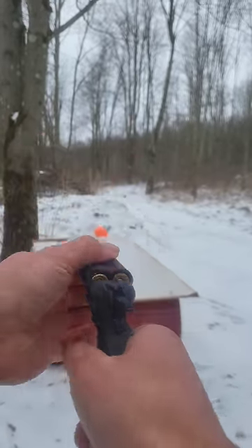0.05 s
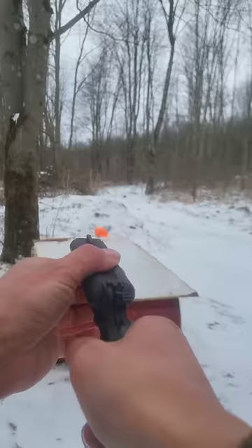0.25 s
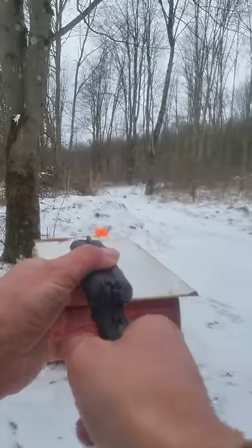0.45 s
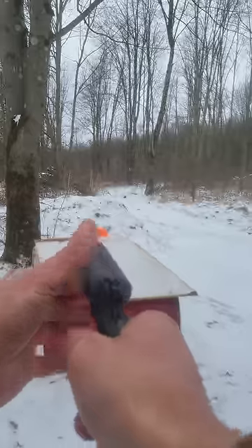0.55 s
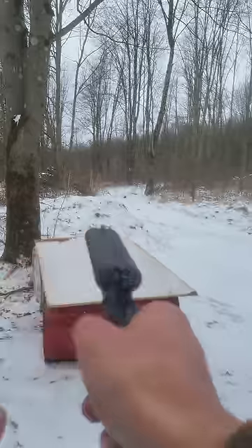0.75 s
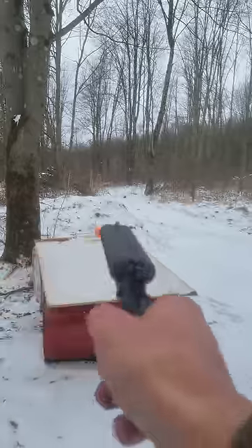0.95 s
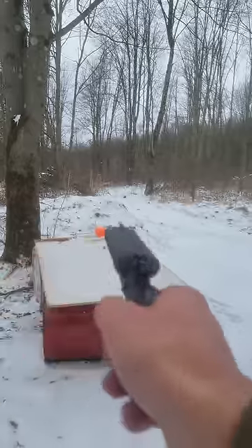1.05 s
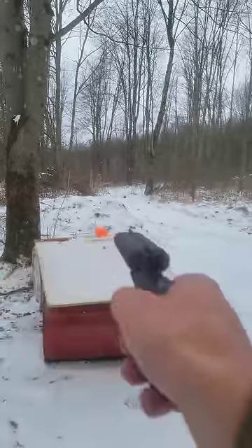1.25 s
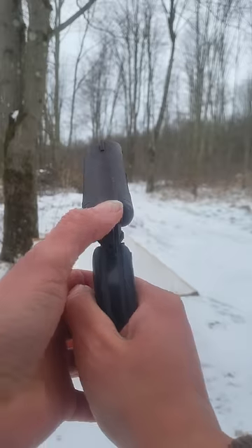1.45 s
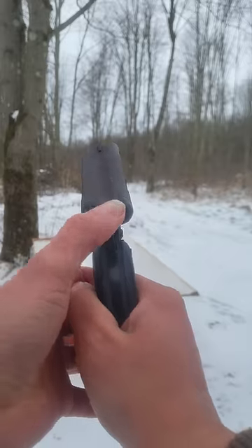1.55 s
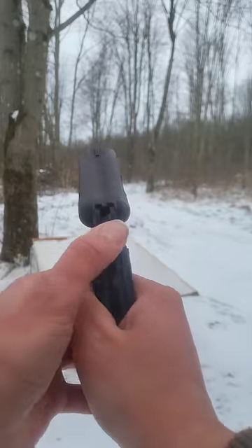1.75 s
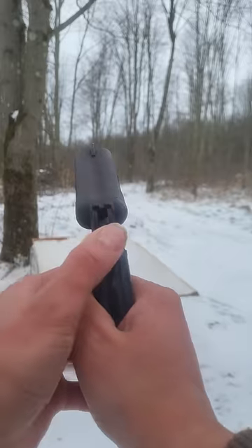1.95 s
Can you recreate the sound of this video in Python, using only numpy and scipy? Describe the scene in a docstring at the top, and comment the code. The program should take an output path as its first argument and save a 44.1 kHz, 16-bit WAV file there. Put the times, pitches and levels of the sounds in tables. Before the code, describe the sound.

A small break-action gun snaps shut, heard close outdoors. A crisp latch click comes at 0.12 s, then a very short rising scrape and a loud, hard metallic clack at 0.24 s with a brief, faint scattered tail. A dull soft bump at 0.95 s sits among sleeve rustle and low wind, which drop suddenly at 1.4 s. A faint tick at 1.72 s precedes small hammer clicks around 1.84-1.86 s.

```python
"""Closing a small gun in a snowy wood

Light wind rumbles and a sleeve rustles: both are coloured noise whose levels rise and fall.
The latch clicks, then the barrels scrape home and snap shut; later the hammer is drawn in small clicks.
Each metal part is a set of dying tones, tapped by short rough blows or driven by growing friction noise.
Snow, hands, a crate and trees answer with decaying noise; small ticks and dull bumps are damped swings.
At 1.404 s the wind and the rustle drop suddenly."""
import sys
import numpy as np
from scipy import signal
from scipy.fft import rfft, irfft
from scipy.io import wavfile
from scipy.ndimage import uniform_filter1d

SR = 44100
rng = np.random.default_rng(int(sys.argv[2]) if len(sys.argv) > 2 else 0)


def volts_from_decibels(level):
    """Turn decibel levels (scalar or array-like) into linear amplitude factors."""
    exponent = np.asarray(level, float) / 20
    return 10 ** exponent


def int16_out(signal):
    """Quantize to a 16-bit WAV file."""
    q = np.round(np.clip(np.atleast_2d(signal).T, -1, 1) * 32767)
    wavfile.write(sys.argv[1], SR, q.astype(np.int16))


N = 88200  # samples, two seconds


def evened(x):
    """Scale a signal to an average (rms) level of one."""
    return x / np.sqrt(np.mean(x ** 2) + 1e-20)


def read(points, hz):
    """Read a curve between its points, along a logarithmic pitch scale."""
    point_hz, value = np.transpose(points)
    return np.interp(np.log(hz + 1), np.log(point_hz + 1), value)


def add(mix, start_s, sound):
    """Lay a sound into the mix at its start time, cut off at the end of the mix."""
    part = mix[:, round(start_s * SR):][:, :sound.shape[1]]
    part += sound[:, :part.shape[1]]


# How much louder noise is on the left than on the right.
# Each row: frequency in Hz, left minus right in dB.
SIDE_BALANCE = [(300, 0), (1300, -6), (3000, 0.5), (6000, 5), (15000, -0.5)]


def noise(colour, same, length, patchy_db=0., flicker_db=0., size=512):
    """Coloured stereo noise from random short-time spectra, with drifting patches and wide flicker."""
    frames, hz = length * 4 // size + 5, np.fft.rfftfreq(size, 1 / SR)
    a, b, c, d, patch = rng.standard_normal((frames, len(hz), 5)).T
    patch = uniform_filter1d(patch, size=6, axis=0)  # smooth across frequency
    patch = evened(uniform_filter1d(patch, size=14, axis=1))  # smooth along time
    flicker = evened(uniform_filter1d(rng.standard_normal(frames), size=3))
    # the right side is partly a copy of the left, partly its own noise
    likeness = np.clip(read(same, hz), -1, 1)[:, None]
    left = a + 1j * b
    right = likeness * left + np.sqrt(1 - likeness ** 2) * (c + 1j * d)
    half_side = read(SIDE_BALANCE, hz)[:, None] / 2
    level_db = read(colour, hz)[:, None] + patchy_db * patch + flicker_db * flicker
    spectra = np.array([left, right]) * volts_from_decibels(level_db) * volts_from_decibels(np.array([half_side, -half_side]))
    return evened(signal.istft(spectra, nperseg=size, noverlap=size * 3 // 4)[1][:, :length])


# How loud the moving air and the sleeve are over time.
# Each row: time in seconds, wind rumble level in dB, sleeve rustle level in dB.
AIR_LEVELS = [(0, -70.5, -66.5), (.11, -63.5, -70.5), (.2, -64.5, -70.5), (.45, -66.5, -78.5),
              (.62, -66.5, -79), (.74, -65, -67.5), (.84, -66.5, -63.5), (1.0, -60, -65), (1.15, -62, -62),
              (1.26, -58.5, -67), (1.36, -58, -65.5), (1.4037, -60, -66.5), (1.4042, -65.5, -87.5),
              (2, -66, -82)]
# Colour of the wind. Each row: frequency in Hz, relative level in dB per Hz.
RUMBLE_COLOUR = [(12, -50.5), (20, -22.5), (70, 0), (114, -15.5), (416, -27), (700, -36), (910, -63),
                 (1540, -120)]
# How alike the wind is on both sides. Each row: frequency in Hz, likeness from -1 to 1.
RUMBLE_LIKENESS = [(30, .3), (400, 0.0048)]


def wind_rumble():
    """Light wind: low noise, its level gliding from point to point."""
    time_s, rumble_db, _ = np.transpose(AIR_LEVELS)
    level = volts_from_decibels(np.interp(np.arange(N) / SR, time_s, rumble_db))
    return noise(RUMBLE_COLOUR, RUMBLE_LIKENESS, N, patchy_db=1.0, size=2048) * level


# Colour of the cloth. Each row: frequency in Hz, relative level in dB per Hz.
RUSTLE_COLOUR = [(88, -32.5), (150, -3), (297, -10.5), (356, -1), (846, -15), (1390, -9), (1910, -10),
                 (3850, -22), (5500, -30), (8000, -50), (13000, -38)]
# How alike the cloth is on both sides. Each row: frequency in Hz, likeness from -1 to 1.
RUSTLE_LIKENESS = [(60, 0.45), (180, -0.61), (4970, -0.34)]


def sleeve_rustle():
    """Cloth rubbing as the arm swings: patchy, flickering noise that swells and fades."""
    time_s, _, rustle_db = np.transpose(AIR_LEVELS)
    level = volts_from_decibels(np.interp(np.arange(N) / SR, time_s, rustle_db))
    return noise(RUSTLE_COLOUR, RUSTLE_LIKENESS, N, patchy_db=3.0, flicker_db=1.4531) * level


# Colour of the hiss. Each row: frequency in Hz, relative level in dB per Hz.
HISS_COLOUR = [(410, -29.5), (700, 0), (1020, -18.5), (1260, -4.5), (1850, -14.5), (2890, -7.5),
               (3050, -17), (16200, -19.5)]


def hiss():
    """The faint hiss of wood and microphone: soft noise at a steady level."""
    return noise(HISS_COLOUR, [(1, .05)], N, patchy_db=0.67) * volts_from_decibels(-88)


def ring(rings, rise_swings, tilt=0.):
    """One tap's answer: dying tones that build up over some swings; neighbours swing opposite ways."""
    hz, t60, left_db, right_db = np.transpose(rings)[:, :, None]
    lag_s = np.array([0, 0.00033])[:, None, None]  # the right side hears the gun later
    t = np.maximum(np.arange(3000) / SR - lag_s, 0)
    db = np.array([left_db, right_db]) + tilt * np.log2(hz / 3000) - 60 * t / t60
    sign = (-1.) ** np.arange(len(rings))[:, None]
    build_up = np.sin(np.pi / 2 * np.minimum(t * hz / rise_swings, 1)) ** 2
    return (sign * build_up * volts_from_decibels(db) * np.sin(2 * np.pi * hz * t)).sum(1)


# Colour of the unpitched crack in every blow. Each row: frequency in Hz, relative level in dB per Hz.
CRACK_COLOUR = [(300, -30), (750, -16.5), (1080, -29.5), (1350, -4), (3000, -0.5), (5000, -10.5),
                (5900, -2.5), (8100, -32), (10000, -18.5), (13800, -9.5), (16200, -20.5)]


def blows(table, rings, rise_swings, crack_db):
    """Each blow: a tap smeared by rough contact rings the part, and a crack of noise dies fast."""
    contact_s, crack_rise_s, crack_t60 = 0.0014, 0.00014, .012
    out, t = np.zeros((2, N)), np.arange(2048) / SR
    touch_t = t[:100]
    for start_s, db, tilt in table:
        roughness = 0.072 * np.exp(-touch_t / contact_s) * rng.standard_normal(100)
        contact = (touch_t == 0) + roughness
        ringing = signal.fftconvolve(ring(rings, rise_swings, tilt), contact[None], axes=1)[:, :2048]
        colour = [(hz, level + tilt * np.log2(hz / 3000)) for hz, level in CRACK_COLOUR]
        fade = np.minimum(t / crack_rise_s, 1) * volts_from_decibels(crack_db - 60 * t / crack_t60)
        crack = noise(colour, [(1, .3)], 2048) * fade
        add(out, start_s, (ringing / 2 + crack) * volts_from_decibels(db))
    return out


def scrape(slide, rings):
    """Growing friction noise rings a part until the slide ends."""
    start_s, end_s, end_db, growth_db, tilt = slide
    t = np.arange(start_s, end_s, 1 / SR)
    friction = rng.standard_normal(len(t)) * volts_from_decibels(end_db + growth_db * (t - end_s) / (end_s - start_s))
    body, out = ring(rings, 0.9884, tilt), np.zeros((2, N))
    add(out, start_s, signal.fftconvolve(body / np.linalg.norm(body), friction[None], axes=1))
    return out


# Tones of the latch.
# Each row: frequency in Hz, time to fall 60 dB in seconds, relative left level in dB, right level in dB.
LATCH_RINGS = [(594, 0.014056, -22, -19), (1450, 0.014, -25, -19), (2423, .01, -17.5, -12),
               (2760, 0.012, -16, -15), (3680, .012, -1.5, 0.54), (4480, 0.0083, 0, -11.5),
               (5550, 0.0061, -4.5, -13), (7004, 0.012, -6.5, -26), (9915, .005, -8.5, -15.5),
               (13620, .006, -11, -7), (14925, .005, -12, -12.5)]
# Clicks of the latch.
# Each row: start in seconds, relative level in dB, tilt in dB per octave about 3 kHz.
LATCH_CLICKS = [(.023, -59, 0.4), (.0292, -52.5, -4.5), (.1232, -13.5, 2), (.1334, -36, 2),
                (.1804, -47, -9), (.95, -52.5, -8)]


def latch():
    """The latch clicks: small blows ring its quick-rising tones."""
    return blows(LATCH_CLICKS, LATCH_RINGS, rise_swings=0.46, crack_db=-16.5)


# Tones of the hammer, also rung by the hinge.
# Each row: frequency in Hz, time to fall 60 dB in seconds, relative left level in dB, right level in dB.
HAMMER_RINGS = [(1458, .014, -19.5, -8.5), (1979, 0.016, 6, 8.5), (2993, 0.0076, -17.5, -17),
                (4132, .008, -5.5, -9.5), (4650, 0.0101, -2, -4.5), (5604, 0.0077, -5, -17),
                (6540, 0.0055, -2.5, -18.5), (10770, 0.0033, -6, -12.5)]
# The hinge's slide, one row: start in seconds, end in seconds, final relative level in dB,
# growth in dB, tilt in dB per octave about 3 kHz.
HINGE_SLIDE = (.05, 0.0918, -64.5, 3.5, -6)


def hinge():
    """The hinge turns: faint friction noise rings the same tones as the hammer."""
    return scrape(HINGE_SLIDE, HAMMER_RINGS)


# Tones of the gun's frame.
# Each row: frequency in Hz, time to fall 60 dB in seconds, relative left level in dB, right level in dB.
FRAME_RINGS = [(480, .014, -23, -21), (760, 0.012, -22, -17), (1371.5, 0.011, -24.5, 1.5),
               (1785, 0.011, -9, -1.5), (2440, 0.013, -10.5, -2.5), (2843.6, 0.0087, -6, -10.5),
               (3270, 0.0088, -3, -9), (4093, 0.023, -14, -16), (4716, 0.013, -12.5, -11),
               (5715, 0.0097, -2.5, -12), (6500, 0.0036, -7.5, -11), (10208, 0.0055, -23, -23),
               (11945, 0.0021, -14.5, -19), (13650, 0.0035, -9, -5), (14800, .005, -11, -13)]
# The barrels sliding home, one row: start in seconds, end in seconds, final relative level in dB,
# growth in dB, tilt in dB per octave about 3 kHz.
BARREL_SLIDE = (.209, 0.2481, -24.5, 37, 0.85)
# Blows of the barrels shutting.
# Each row: start in seconds, relative level in dB, tilt in dB per octave about 3 kHz.
SNAP_BLOWS = [(.2378, -21, 1.05), (.2408, -12.5, 1.5), (.2441, 1.3329, 0.1178)]


def barrels_shut():
    """The barrels slide home with fast-growing friction, and blows ring the frame as they snap shut."""
    snap = blows(SNAP_BLOWS, FRAME_RINGS, rise_swings=1.3, crack_db=-14)
    return snap + scrape(BARREL_SLIDE, FRAME_RINGS)


# Small pitched ticks of parts settling, and dull bumps.
# Each row: start in seconds, level in dB, frequency in Hz, time to fall 60 dB in seconds.
TICKS_AND_BUMPS = [(.243, -44, 189.6, 0.030915), (0.269, -41.5, 65, 0.1307), (.449, -65, 1797, 0.0174),
                   (.948, -38, 182, 0.0285), (.949, -44, 341.5, 0.022), (1.292, -40.5, 73, 0.15445),
                   (1.384, -71, 6365, 0.0163), (1.7227, -51.5, 2150, 0.0189), (1.7238, -67, 3216, 0.019)]


def bumps():
    """Ticks and bumps: single damped swings with a soft start, a little louder on the left."""
    out, t = np.zeros((2, N)), np.arange(SR // 4) / SR
    for start_s, db, hz, t60 in TICKS_AND_BUMPS:
        soft_start = np.minimum(t * np.minimum(hz, 400), 1)
        swing = volts_from_decibels(db - 60 * t / t60) * soft_start * np.sin(2 * np.pi * hz * t)
        add(out, start_s, swing * volts_from_decibels(np.array([[1.5], [-1.5]])))
    return out


# Clicks of the hammer.
# Each row: start in seconds, relative level in dB, tilt in dB per octave about 3 kHz.
HAMMER_CLICKS = [(1.6388, -67.5, -5.5), (1.8388, -35.5, 1.5), (1.8465, -52.5, -12), (1.852, -46, -4.5),
                 (1.8585, -32, 0.5), (1.883, -62.5, -3)]
# The hammer's slide, one row: start in seconds, end in seconds, final relative level in dB,
# growth in dB, tilt in dB per octave about 3 kHz.
HAMMER_SLIDE = (1.715, 1.89, -75, 4.5, -5)


def hammer():
    """A thumb draws the hammer back: clicks ring its slow-rising tones over a faint scrape."""
    clicks = blows(HAMMER_CLICKS, HAMMER_RINGS, rise_swings=5.2, crack_db=-22)
    return clicks + scrape(HAMMER_SLIDE, HAMMER_RINGS)


# How long the trees' tail lasts. Each row: frequency in Hz, time to fall 60 dB in seconds.
TREE_DECAY = [(1200, 0.48), (4000, 0.51), (14000, 0.4)]
# How well the surroundings throw each band back. Each row: frequency in Hz, gain in dB.
RETURN_COLOUR = [(600, -7), (1300, -2.5), (3200, -3), (4500, 6), (5800, -2.5), (9500, 8), (14500, -3)]


def wood(x):
    """Close scatter, one smeared echo from the crate, and trunks whose bands die at their own speeds."""
    trees_db, near_db, echo_db = -37.5, -19, -32.5
    near_t60, near_end_s = 0.12, 0.08  # snow, hands and crate scatter until the crate's far edge
    echo_s, echo_smear_s = .0375, 0.00499  # the crate ahead
    length = SR // 2
    hz, t, spectra = signal.stft(rng.standard_normal((2, length)), SR, nperseg=256)
    spectra = spectra * volts_from_decibels(-60 * t / read(TREE_DECAY, hz)[:, None])
    trees = signal.istft(spectra, SR, nperseg=256)[1][:, :length]
    t = np.arange(length) / SR
    near = rng.standard_normal((2, length)) * volts_from_decibels(-60 * t / near_t60) / (1 + (t / near_end_s) ** 6)
    echo = rng.standard_normal((2, length)) * (t > echo_s) * np.exp(-abs(t - echo_s) / echo_smear_s)
    parts = [(trees_db, trees), (near_db, near), (echo_db, echo)]
    answer = sum(volts_from_decibels(db) * part / np.linalg.norm(part[0]) for db, part in parts)
    answer = np.clip(t / .006, 0, 1) * answer  # fades in over 6 ms
    answer = irfft(rfft(answer) * volts_from_decibels(read(RETURN_COLOUR, np.fft.rfftfreq(length, 1 / SR))), length)
    both_sides = x + 0.33 * x[::-1]  # each side also gets some of the other
    return signal.fftconvolve(both_sides, answer, axes=1)[:, :N]


def scene():
    """Mix the gun, the wood's answer, the bumps and the air."""
    small = latch() + hinge() + hammer()
    snap = barrels_shut()
    # a small gun radiates no bass: cut below 260 Hz
    no_bass = signal.butter(2, 260, "high", fs=SR, output="sos")
    small, snap = signal.sosfilt(no_bass, [small, snap])
    # hands shield latch, hinge and hammer from the wood by 7.5 dB
    answer = wood(snap + volts_from_decibels(-7.5) * small)
    air = wind_rumble() + sleeve_rustle() + hiss()
    return small + snap + answer + bumps() + air


def top_cut(x):
    """Nothing passes above the cut-off."""
    return signal.sosfilt(signal.butter(12, 16320, fs=SR, output="sos"), x)


def record(dry):
    """Cut the peaks off at a hard ceiling of full scale."""
    mix = np.clip(dry, -1, 1)
    return top_cut(mix)


dry = scene()
out = record(dry)
int16_out(out)
```